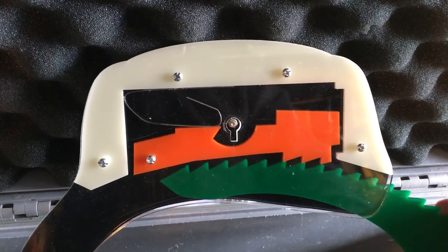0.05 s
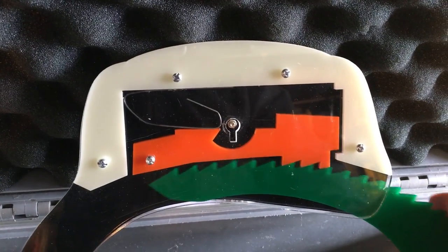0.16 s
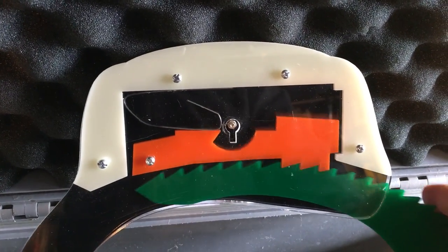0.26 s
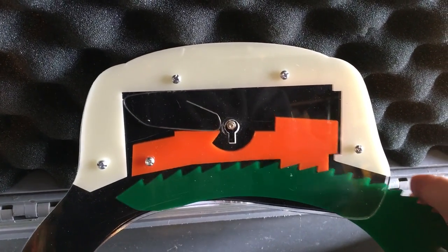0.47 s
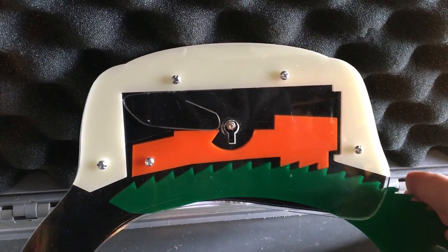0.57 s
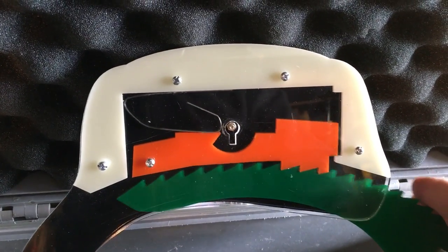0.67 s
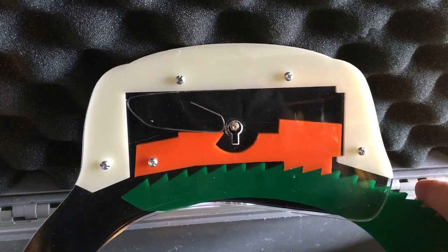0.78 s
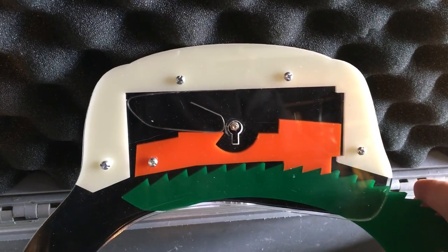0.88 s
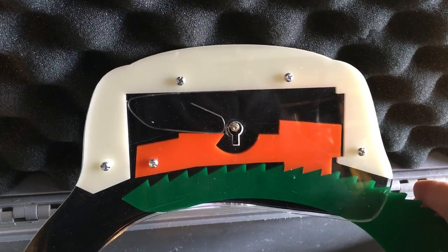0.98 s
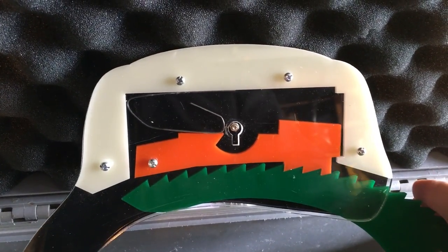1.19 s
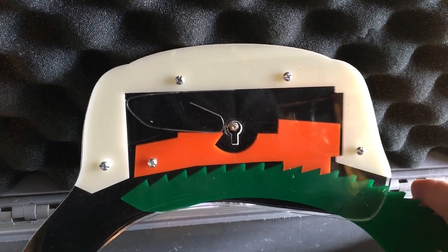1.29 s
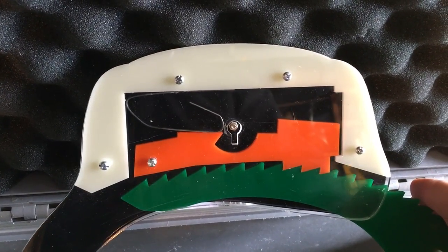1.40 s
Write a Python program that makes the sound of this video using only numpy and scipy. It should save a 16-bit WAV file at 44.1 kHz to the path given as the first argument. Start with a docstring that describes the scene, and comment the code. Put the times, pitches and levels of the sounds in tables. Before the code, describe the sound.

Close up in a small room, a large plastic handcuff ratchet gives three sharp, evenly spaced clicks, each with a slight low thump. The loose arm knocks lightly between and after them, over faint rumble and hiss.

```python
"""A ratchet clicks close by as the toothed arm of a large plastic handcuff is pushed through it.
Three times the sprung pawl slips off a tooth and snaps onto the next. Each impact excites damped modes
of pawl and frame and thumps the case underneath; the loose arm adds a few light knocks.
A small room reverberates over a low rumble and hiss. A noise gate opens for the snaps and shuts
after them, dulling the hiss."""
import sys
import numpy as np
from scipy import signal
from scipy.fft import rfft, irfft
from scipy.io import wavfile
from scipy.ndimage import uniform_filter1d

SR = 44100
rng = np.random.default_rng(int(sys.argv[2]) if len(sys.argv) > 2 else 0)


def persist_wave(psi):
    """Save psi, clipped to +-1, as 16-bit WAV."""
    counts = np.round(np.clip(psi, -1, 1) * 32767).astype(np.int16)
    wavfile.write(sys.argv[1], SR, np.atleast_2d(counts).T)


N = 63945

# Spectra of the steady rumble and hiss: frequency_hz, density_db
RUMBLE_SPECTRUM = [(15, -35), (28, -17), (50, -5), (72, -2), (110, -5), (140, -10), (175, -21.5),
                   (225, -17.5), (280, -24), (500, -38), (1000, -59)]
HISS_SPECTRUM = [(30, -9), (300, 1), (600, -1.5), (1000, 1), (1600, -3.5), (3000, -6), (6000, -11),
                 (10000, -13), (15500, -17.5)]
# Decay of reflections inside the open case and in the room: frequency_hz, t60_s
CAVITY_DECAY = [(1000, 0.0803), (12000, 0.071)]
ROOM_DECAY = [(200, .25), (1500, 0.13), (5000, 0.27), (12000, 0.14), (16000, .15)]
# Colour of all these reflections: frequency_hz, gain_db
REFLECTION_COLOUR = [(200, -16), (700, -9.5), (1100, 3.5), (2000, 3), (3000, 0.5), (3600, 0.5), (4400, 1),
                     (5200, -6.5), (6000, -1), (7200, -6.5), (8500, -6.5), (10400, -11), (11600, -2.5),
                     (12300, -6), (16000, -13)]
# Light knocks of the loose arm: start_s, level_db, cutoff_hz
KNOCKS = [(0.2525, -27.5, 1760), (0.4290, -39, 1640), (0.443, -26, 1467), (0.7900, -23.5, 7000),
          (0.792, -43, 4000), (0.8225, -39, 1710)]
# Colour of a knock: frequency_hz, gain_db
KNOCK_COLOUR = [(500, -6.5), (1000, -2.5), (1350, 4.5), (1750, 1.5), (2100, -1), (2800, -4.5), (3450, 3),
                (4250, -12), (4900, 3.5), (6000, -1.5), (9000, -3), (12000, -7.5)]
# Faint ticks of the pawl riding up a tooth: start_s, level_db
TICKS = [(0.1795, -47), (0.3195, -54), (0.5076, -47.5)]
# Modes of the case, the wire spring and screws, and the pawl and frame: pitch_hz, level_db, t60_s
CASE_MODES = [(122.4, 0, 0.11), (150, 1, .06), (181.6, -6, 0.077), (220, -3, 0.054), (299.5, -7.5, 0.09)]
SPRING_MODES = [(4520, -3, .27), (5458, -4.5, .17), (6724, -1.5, .14), (7236, -2.5, 0.21), (11470, 0, 0.22),
                (11640, 1, .14), (11900, -5, .15)]
PAWL_MODES = [(1166, -21, .08), (1200, -21.5, 0.014), (1615, -22, .055), (1820, -20, .055),
              (1967, -13, 0.06), (2091, -3.5, 0.023), (2560, -6, .018), (2770, -8, 0.026),
              (2915, -8, 0.017), (3365, -7, 0.021), (3790, -14, 0.022), (4262, -4.5, .021),
              (4532, -11, 0.022), (5992, -4.5, 0.011), (11620, -3.5, .017)]
# Spectrum of the crack of dense, quickly damped modes: frequency_hz, density_db
CRACK_SPECTRUM = [(100, -21.5), (400, -29.5), (600, -16), (780, -22.5), (950, -10.5), (1400, -7),
                  (2100, -5.5), (2350, -3), (3200, -3.5), (3600, -8), (4300, 4), (5100, -10), (5850, 1.5),
                  (6500, -8), (7200, -5.5), (7600, -10), (8200, -5.5), (9200, -9), (9950, -3.5),
                  (10500, -17), (11000, -5), (11600, -1), (12200, -4), (13300, -14.5), (16000, -19.5)]
# Decay of the crack: frequency_hz, t60_s
CRACK_DECAY = [(200, 0.082), (1200, 0.066), (2500, .031), (5000, .027), (10000, 0.019), (16000, .019)]
# Colour of the slip off a tooth tip: frequency_hz, gain_db
SLIP_COLOUR = [(700, -13.5), (1200, -9), (1650, 3.5), (2100, -4.5), (2450, -0.5), (3250, 2.5),
               (3900, -11.5), (6000, -10.5), (10000, -9), (12000, -23), (16000, -14.5)]
# Points of a snap's colour curve: frequency_hz
SNAP_COLOUR_HZ = [1100, 2000, 3000, 4300, 7000, 12000]
# Pawl snaps: start_s, level_db, colour_db at each of the six SNAP_COLOUR_HZ,
# slip_lead_s, slip_db, slip_treble_db, thump_db
SNAPS = [(0.2008, 1.5, -3.5, 0.5, 0.5, -1.5, 0, -0.5, 0.0071, -9.5, -0.5, 2),
         (0.3402, 0.5, -4, -1.5, 2, -1, 2.5, 0, 0.0066, -24.5, 3, -0.5),
         (0.5282, 1.5, -1.5, -5, -.5, 1.5, -.5, 3.5, .0052, -27, 8, 0.5)]
# Treble loss through the shut gate: frequency_hz, gain_db
GATE_CUT = [(500, -0.5), (1500, -1.5), (3000, -6), (6000, -8.5), (15000, -10.5)]


def amp(db):
    """Amplitude ratio of a level in decibels."""
    return 10 ** (np.asarray(db) / 20)


def unit_rms(x):
    """Normalisation to unit mean power."""
    return x / np.sqrt(np.mean(x ** 2) + 1e-20)


def curve_at(points, hz):
    """Interpolation on a logarithmic frequency axis."""
    point_hz, values = np.transpose(points)
    return np.interp(np.log(hz + 1), np.log(point_hz + 1), values)


def add(mix, start_s, sound):
    """Superposition: a delayed sound adds linearly to the mix."""
    part = mix[max(round(start_s * SR), 0):][:len(sound)]
    part += sound[:len(part)]


def colour(x, points, size=4096):
    """Minimum-phase filter: the phase follows from the log gain by the Hilbert transform."""
    hz = abs(np.fft.fftfreq(size, 1 / SR))
    log_gain = np.log(amp(curve_at(points, hz)))
    response = np.exp(np.conj(signal.hilbert(log_gain)))
    taps = np.fft.ifft(response).real[:size // 2]
    return signal.fftconvolve(x, taps)[:len(x)]


def rolloff(x, cutoff_hz, kind):
    """Second-order low-pass or high-pass filter."""
    return signal.sosfilt(signal.butter(2, cutoff_hz, kind, fs=SR, output="sos"), x)


def modal_ring(modes, rise_s=0.00034):
    """Free vibration: a sum of exponentially damped sinusoids of alternating sign."""
    t = np.arange(16384) / SR
    ring = sum((-1) ** k * amp(db - 60 * t / t60_s) * np.sin(2 * np.pi * hz * t)
               for k, (hz, db, t60_s) in enumerate(modes))
    return ring * (1 - np.exp(-t / rise_s))


def dense_ring(decay, rise_s, bands=28):
    """Modal overlap: crowded modes merge into noise, each band decaying at its own rate."""
    t = np.arange(16384) / SR
    hz = np.fft.rfftfreq(len(t), 1 / SR)
    spectrum = rfft(rng.standard_normal(len(t)))
    edges_hz = np.linspace(0, np.sqrt(SR / 2), bands + 1) ** 2
    ring = 0
    for low, high in zip(edges_hz, edges_hz[1:]):
        analytic = signal.hilbert(irfft(spectrum * (hz >= low) * (hz < high), len(t)))
        steady = unit_rms(analytic.real / np.sqrt(abs(analytic) + 1e-9))  # evens out the envelope
        power_share = 2 * (high - low) / SR
        t60_s = curve_at(decay, (low + high) / 2)
        ring += steady * np.sqrt(power_share) * amp(-60 * t / t60_s)
    return ring * (1 - np.exp(-t / rise_s))


def background(spectrum, rms_db):
    """Stationary noise: spectral weighting turns white noise into rumble or hiss."""
    gain = amp(curve_at(spectrum, np.fft.rfftfreq(N, 1 / SR)))
    noise = irfft(rfft(rng.standard_normal(N)) * gain, N)
    return amp(rms_db) * unit_rms(noise)


def reflections():
    """Reverberation: a diffuse field dies quickly in the open case and more slowly in the room."""
    cavity = amp(-24) * dense_ring(CAVITY_DECAY, rise_s=0.012)
    room = amp(-36.5) * dense_ring(ROOM_DECAY, rise_s=0.005)
    return colour(cavity + room, REFLECTION_COLOUR)


def light_contacts(mix):
    """Weak excitation: one filtered impact gives the pawl's thin ticks and the arm's duller knocks."""
    contact = impact()
    for start_s, level_db in TICKS:
        add(mix, start_s, amp(level_db) * rolloff(contact, cutoff_hz=3000, kind="high"))
    knock = colour(contact, KNOCK_COLOUR)
    for start_s, level_db, cutoff_hz in KNOCKS:
        add(mix, start_s, amp(level_db) * rolloff(knock, cutoff_hz, "low"))


def case_thump(lag_s=0.00033, echo_s=0.0345):
    """Structure-borne sound: a snap excites the low modes of the case, and a duller echo follows."""
    ring = amp(-30.5) * modal_ring(CASE_MODES, rise_s=0.0022)
    thump = np.zeros(N)
    add(thump, lag_s, ring)
    add(thump, lag_s + echo_s, amp(-4) * rolloff(ring, cutoff_hz=143, kind="low"))
    return thump


def impact():
    """Impulse response of pawl and frame: a broadband crack, distinct modes and their reflections."""
    crack = colour(dense_ring(CRACK_DECAY, rise_s=0.00029), CRACK_SPECTRUM)
    return amp(-2.5) * crack + amp(-9.5) * modal_ring(PAWL_MODES) + reflections()


def pawl_slip(treble_db, shelf_hz=(3300, 4200)):
    """Sudden release: the pawl clicks as it leaves a tooth tip."""
    click = colour(impact(), SLIP_COLOUR)
    return colour(click, list(zip(shelf_hz, (0, treble_db))))


def pawl_snap(colour_db):
    """Impact excitation: the pawl lands, and the lightly damped spring and screws ring on faintly."""
    snap = impact() + amp(-54.5) * modal_ring(SPRING_MODES)
    return colour(snap, list(zip(SNAP_COLOUR_HZ, colour_db)))


def ratchet():
    """Release of elastic energy: at each tooth the sprung pawl slips, lands and thumps the case."""
    mix = np.zeros(N)
    thump = case_thump()
    for start_s, level_db, *colour_db, slip_lead_s, slip_db, slip_treble_db, thump_db in SNAPS:
        add(mix, start_s, amp(level_db) * pawl_snap(colour_db))
        add(mix, start_s - slip_lead_s, amp(slip_db) * pawl_slip(slip_treble_db))
        add(mix, start_s, amp(thump_db) * thump)
    light_contacts(mix)
    return mix


def scene():
    """Superposition of ratchet, rumble and hiss in one channel."""
    mix = ratchet() + background(RUMBLE_SPECTRUM, rms_db=-51.5) + background(HISS_SPECTRUM, rms_db=-61)
    return mix[None]


def noise_gate(x, threshold_db=-18, ahead_s=0.021, hold_s=0.423):
    """Threshold gating: the treble is cut except from just before a loud peak until the hold ends."""
    sample = np.arange(N)
    loud = np.roll(abs(x) > amp(threshold_db), -round(ahead_s * SR))
    last_loud = np.maximum.accumulate(np.where(loud, sample, -N))
    held = (sample - last_loud) / SR < hold_s
    openness = uniform_filter1d(held.astype(float), size=400)
    return openness * x + (1 - openness) * colour(x, GATE_CUT)


def record(dry):
    """Gating, peak clipping and band limiting, in that order."""
    clipped = np.clip(noise_gate(dry[0]), -0.85, 0.85)
    lowpass = signal.firwin(255, cutoff=16050, window=("kaiser", 8), fs=SR)
    return signal.fftconvolve(clipped, lowpass, "same")[None]


dry = scene()
out = record(dry)
persist_wave(out)
```